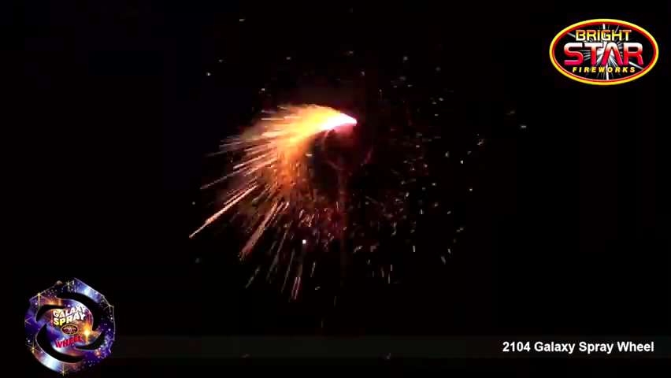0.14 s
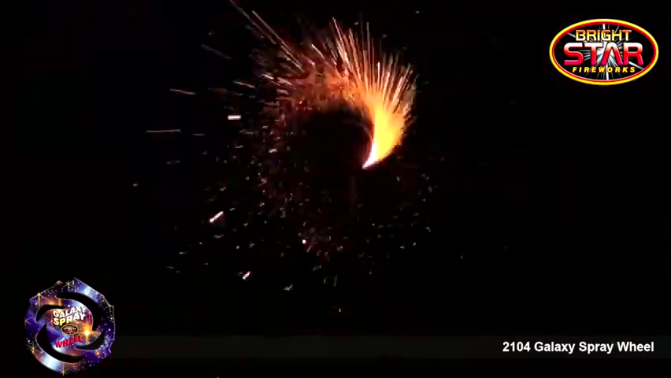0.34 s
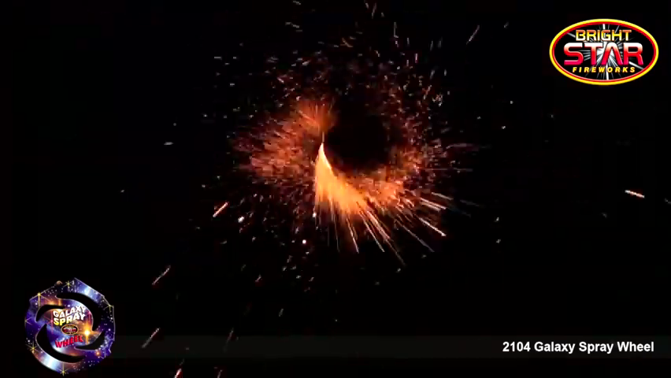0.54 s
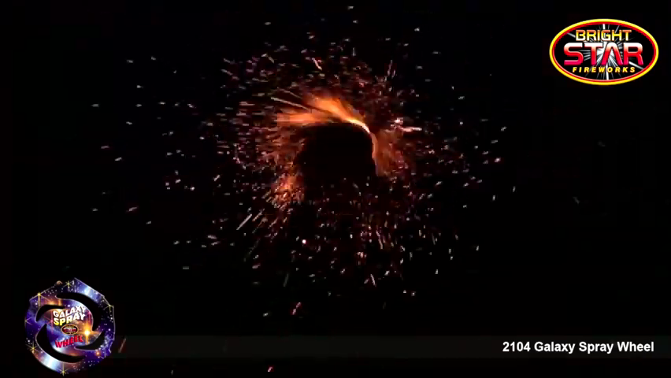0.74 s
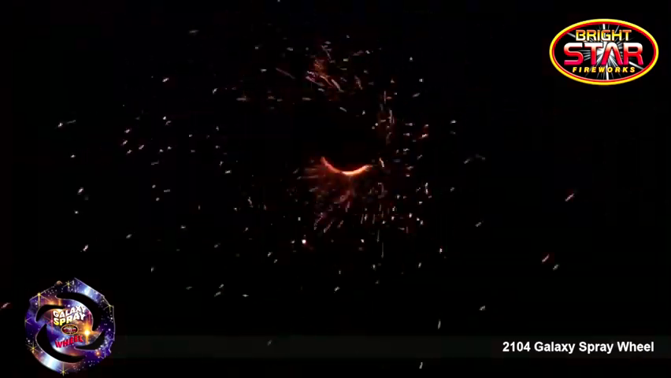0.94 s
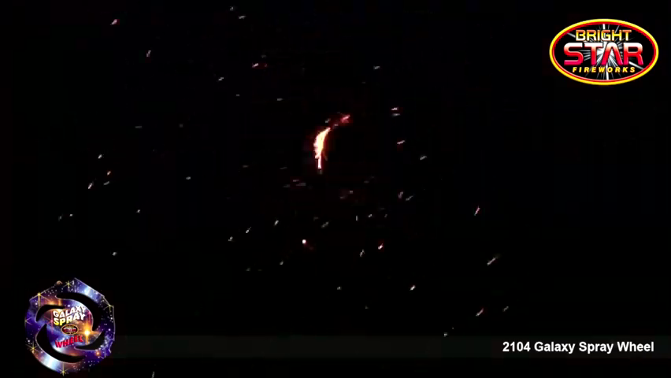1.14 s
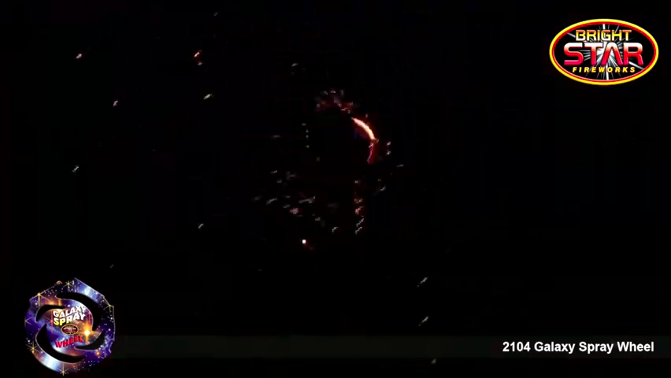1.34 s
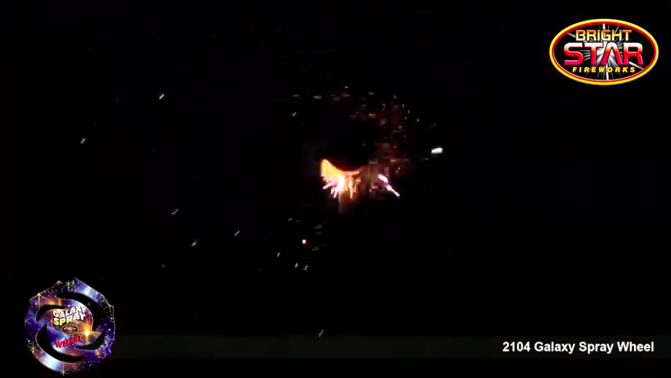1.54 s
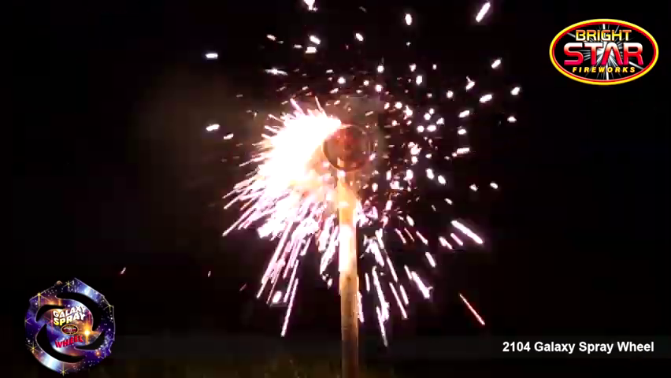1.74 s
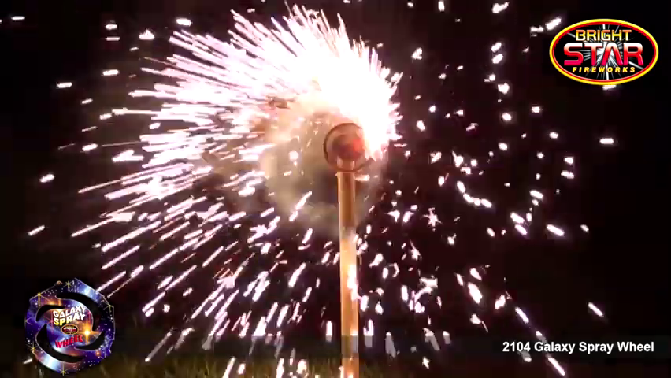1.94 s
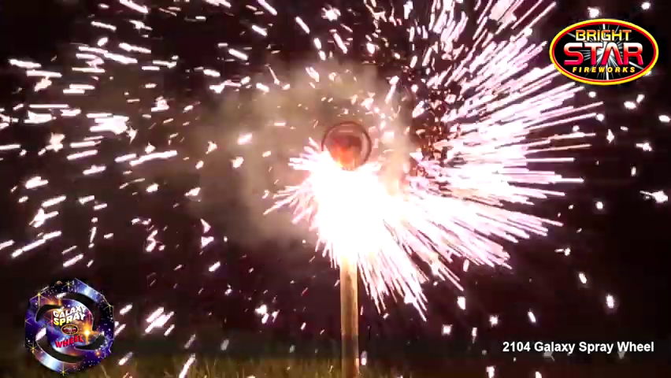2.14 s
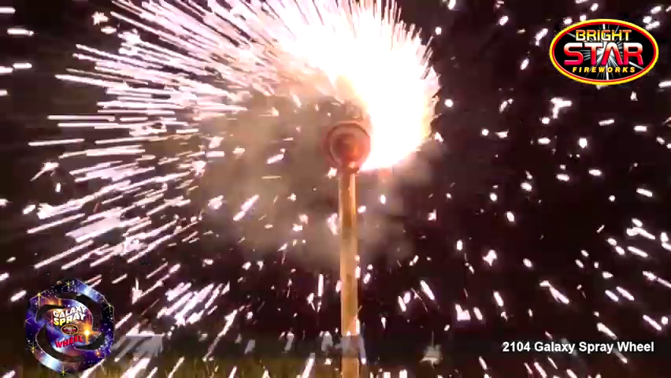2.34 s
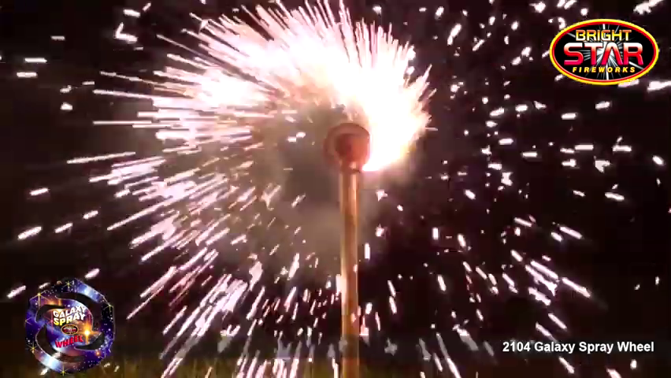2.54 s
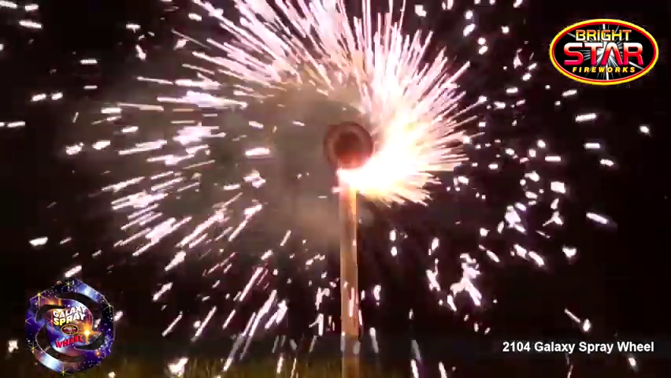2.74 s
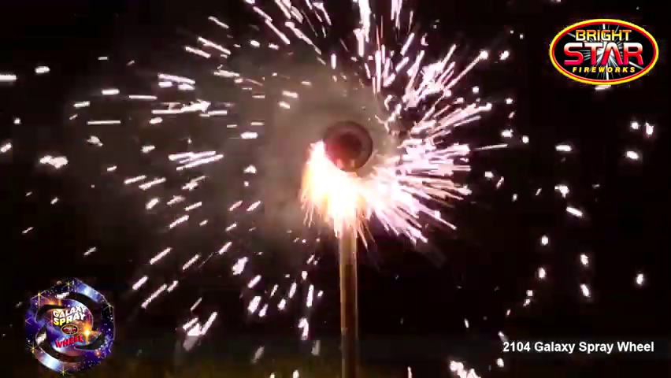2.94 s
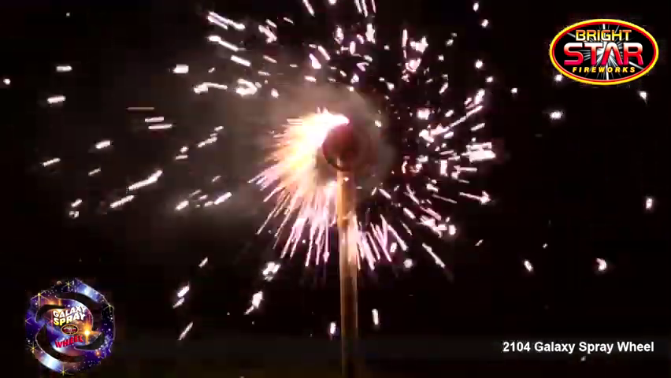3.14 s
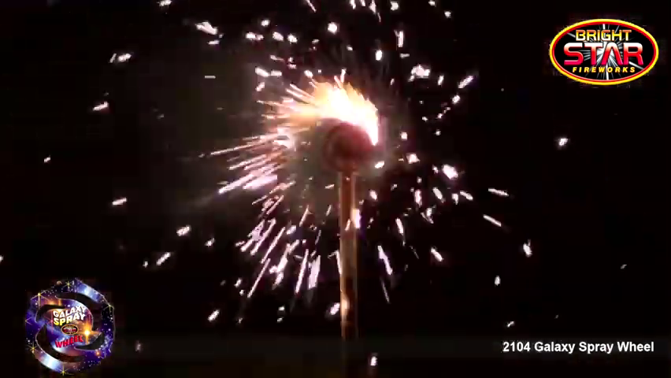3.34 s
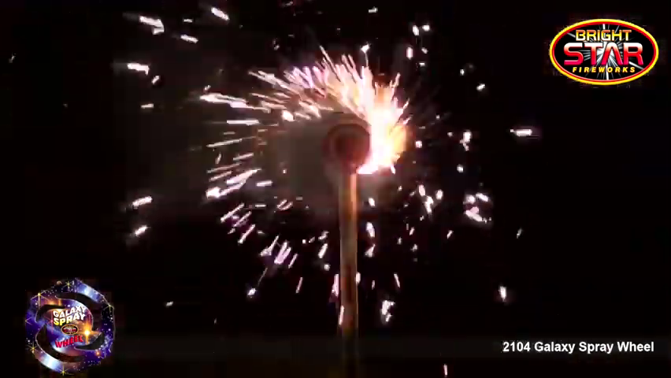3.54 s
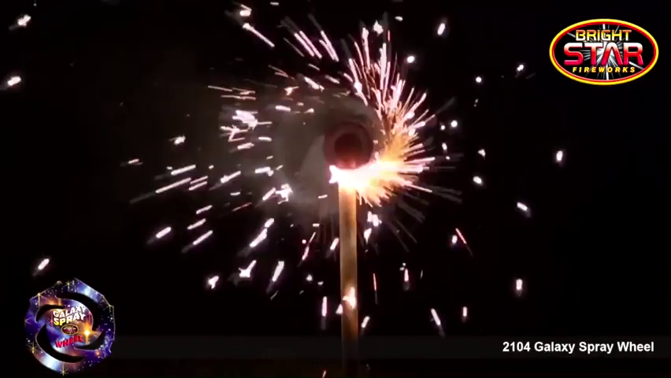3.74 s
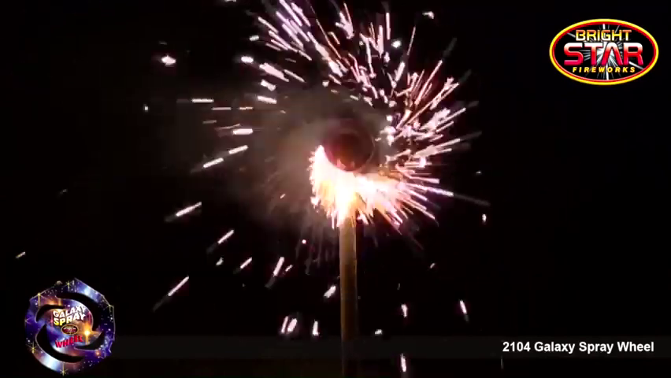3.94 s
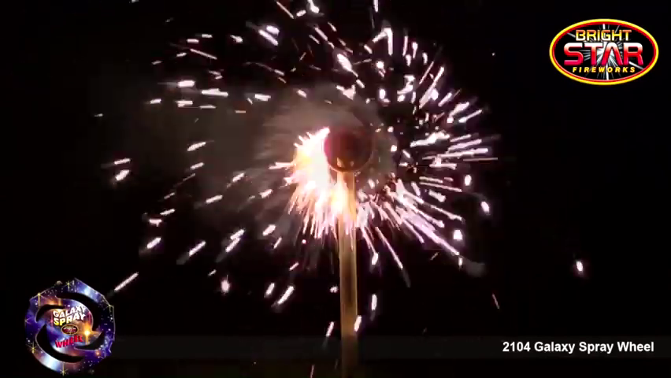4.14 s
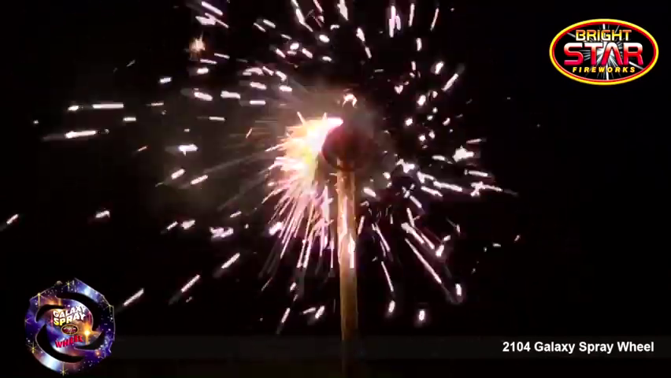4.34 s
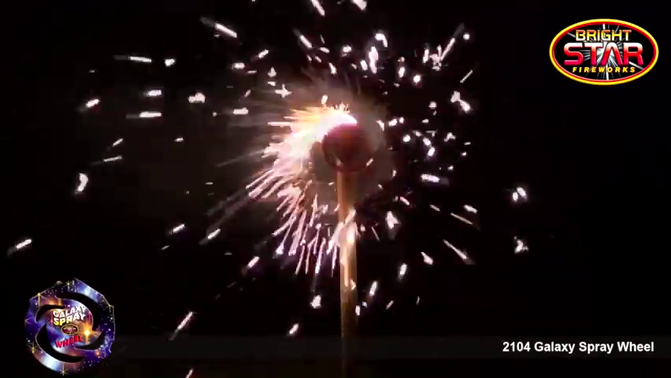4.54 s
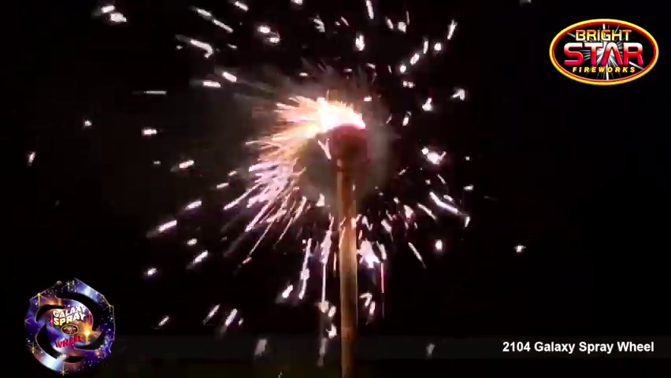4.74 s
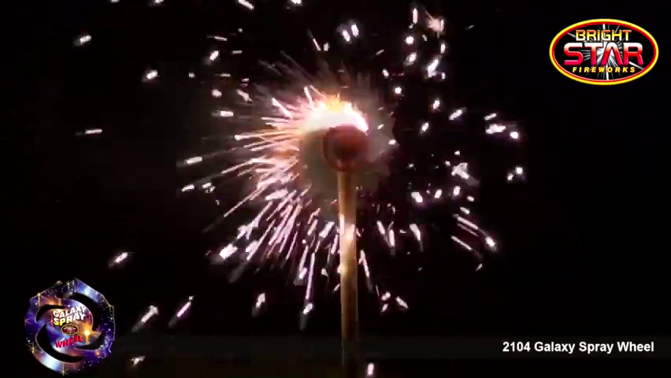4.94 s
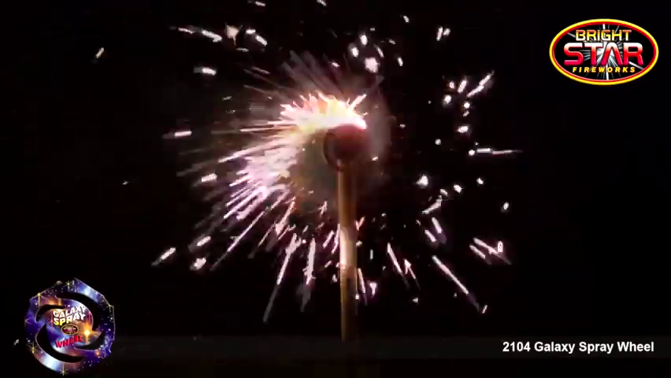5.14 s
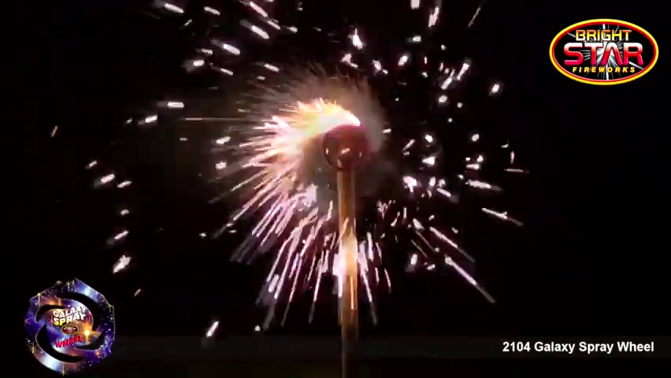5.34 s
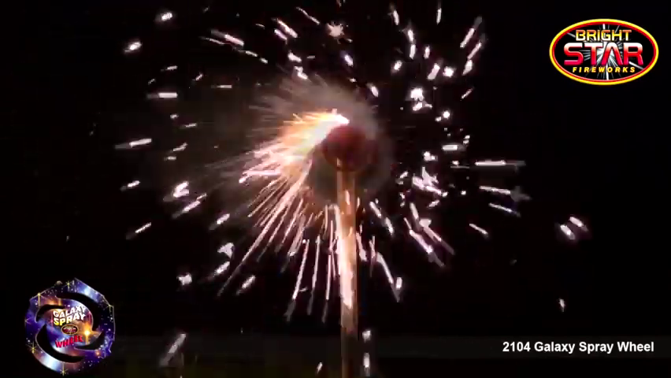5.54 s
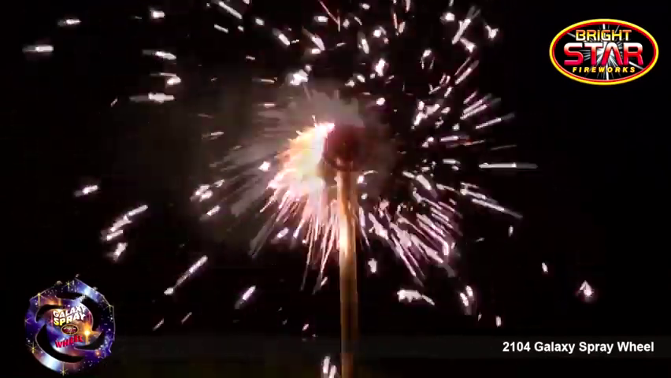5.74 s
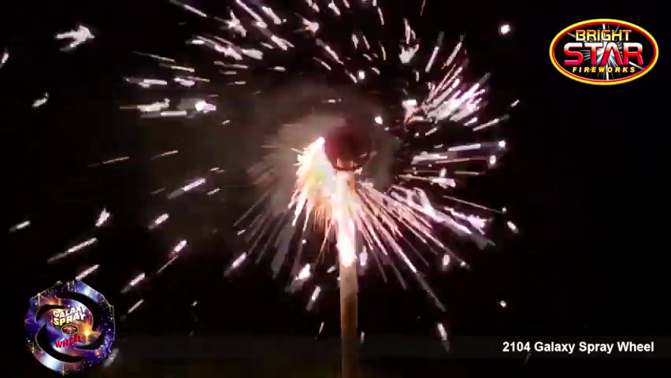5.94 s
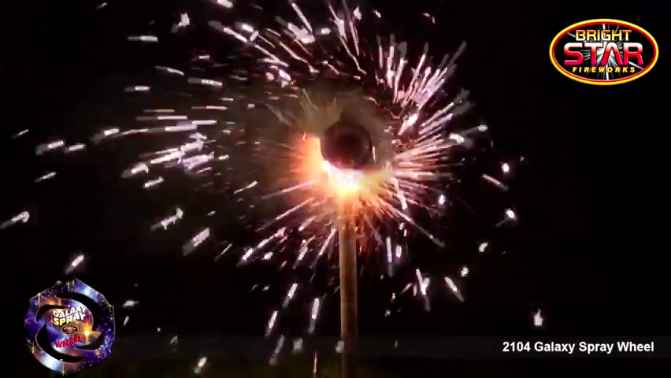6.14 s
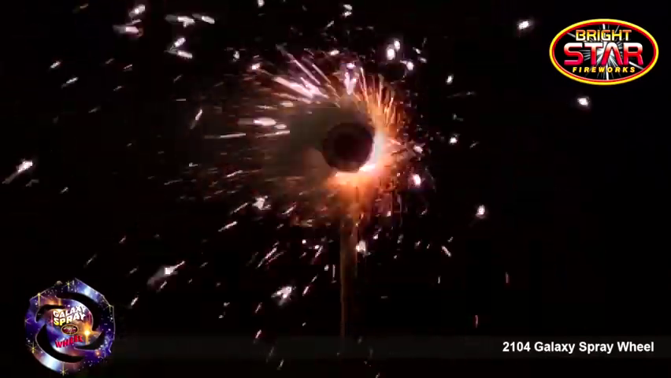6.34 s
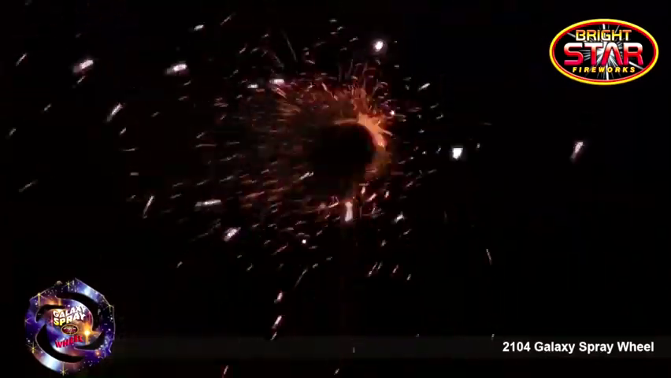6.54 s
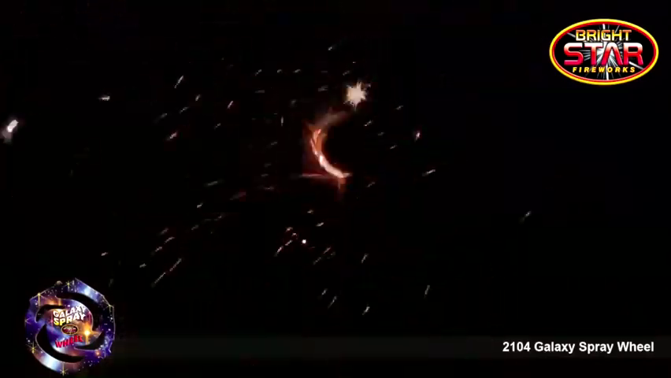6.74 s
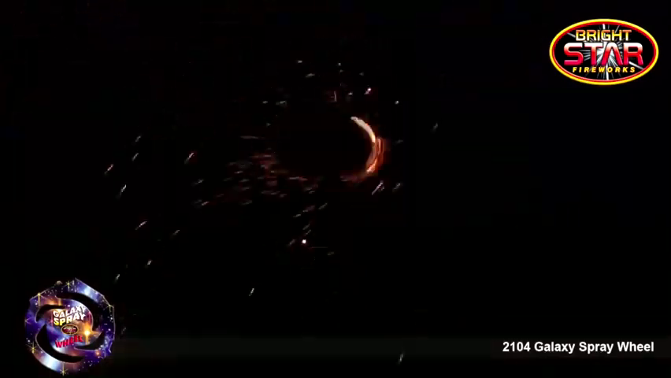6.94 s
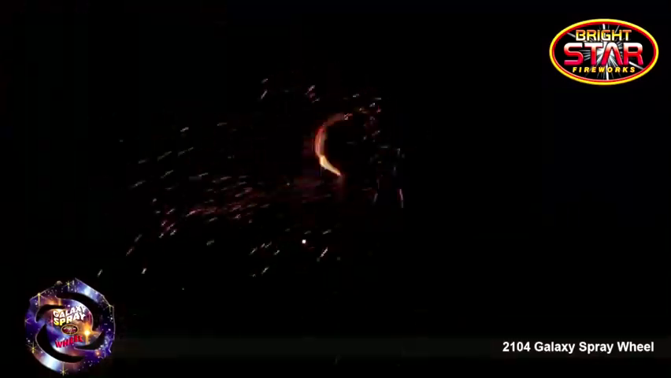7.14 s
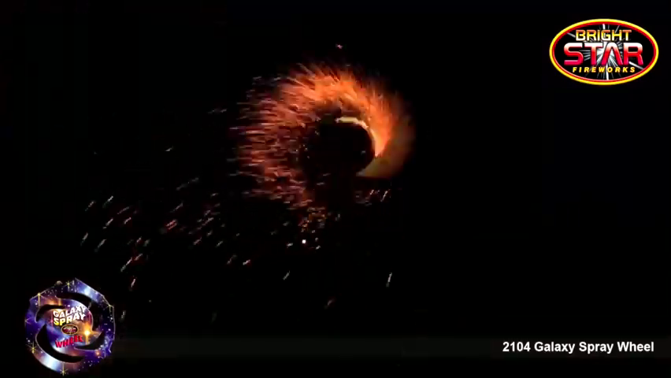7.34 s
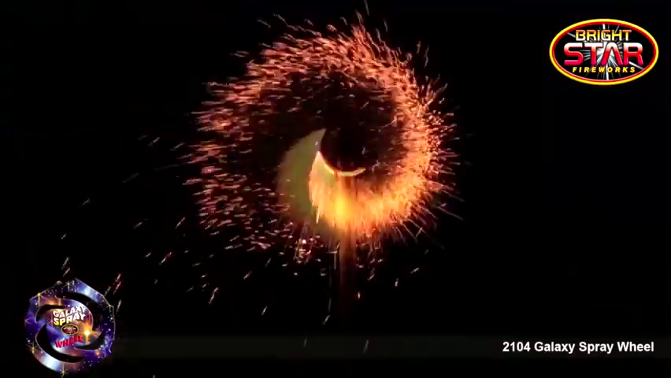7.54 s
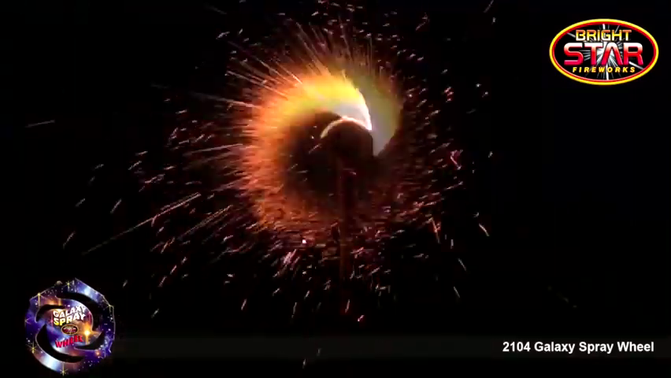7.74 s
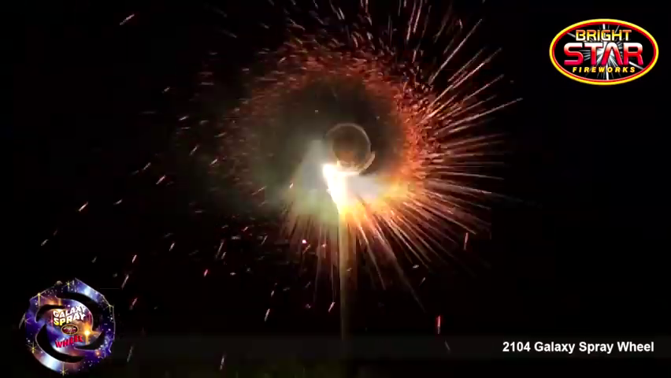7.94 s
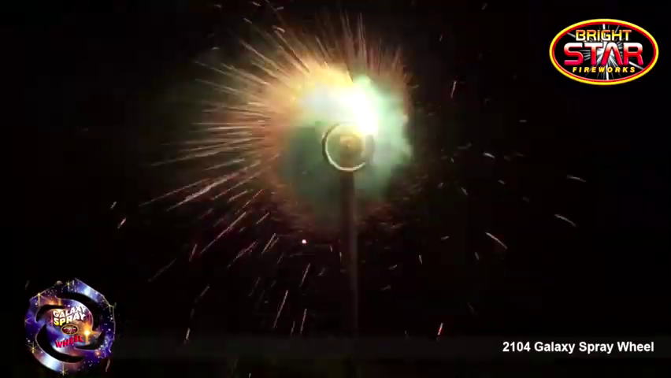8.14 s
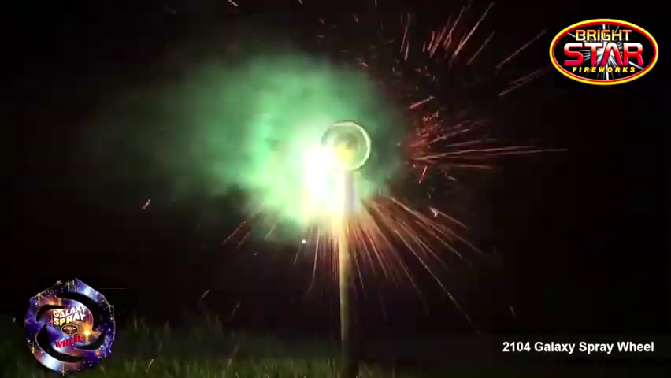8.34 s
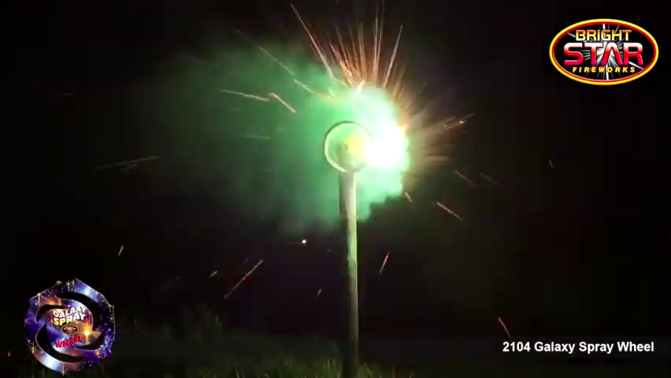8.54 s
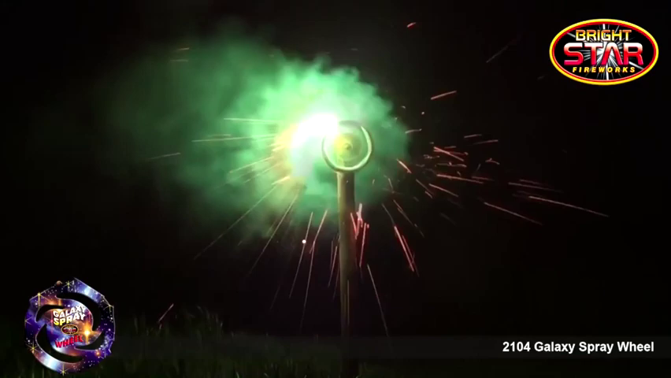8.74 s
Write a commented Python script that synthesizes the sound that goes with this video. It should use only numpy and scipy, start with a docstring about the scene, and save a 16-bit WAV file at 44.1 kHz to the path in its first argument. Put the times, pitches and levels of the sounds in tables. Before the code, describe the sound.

A wheel firework is already spinning at the start, some metres away in an open field, making a loud, bright, gassy hiss that swirls about seven times a second. From 0.7 seconds the hiss fades, with soft low thumps, leaving faint crackling fuse spurts. A small pop comes at 1.4 seconds, then the next stage catches and reaches full strength by 1.7. Its swirl quickens to about eleven turns a second near 2.8, and the hiss weakens slightly around 3.5 before recovering. From 6.2 seconds it dies away into weak sputtering, with a sharp pop at 6.7 and a short spit at 7.2. The third stage lights right after, builds by 7.6 and hisses steadily with a slower swirl until the end, near 9 seconds. A faint distant rumble and slight soft gusts lie underneath, with hardly any echo.

```python
"""The gas jet of a firework wheel hisses and spits sparks on a post in a field at night, some metres away.
The turning nozzle sweeps its beam round and shifts the delay of the ground reflection, so the hiss swirls.
Twice a driver (a tube of powder) burns out, the fuse sputters and pops, and the next driver catches.
Puffs of flame and soft gusts of wind add low thumps and swells, over a dull echo and a faint far rumble."""
import sys
import numpy as np
from scipy import signal
from scipy.fft import rfft, irfft, next_fast_len
from scipy.io import wavfile
from scipy.ndimage import uniform_filter1d, map_coordinates

SR = 44100
rng = np.random.default_rng(int(sys.argv[2]) if len(sys.argv) > 2 else 0)


def digitize_waveform(pressure):
    """Quantize a signal to 16-bit integers and store it at the path in sys.argv[1].

    Rows of a 2-D input are taken as channels; values are limited to [-1, 1].
    """
    field = np.atleast_2d(pressure).T
    bounded = np.clip(field, -1, 1)
    quanta = np.round(bounded * 32767).astype(np.int16)
    wavfile.write(sys.argv[1], SR, quanta)


N = 392049
TIME = np.arange(N) / SR
FFT_SIZE = next_fast_len(N)
FREQ = np.maximum(np.arange(FFT_SIZE // 2 + 1) * SR / FFT_SIZE, 1)


def undb(db):
    """Amplitude ratio of a level in decibels."""
    return 10 ** (np.asarray(db) / 20)


def unit(x):
    """Normalisation to a standard deviation of 1."""
    return x / np.std(x)


def over_time(table):
    """Linear interpolation of a table's columns at every sample."""
    times, *columns = np.transpose(table)
    return [np.interp(TIME, times, column) for column in columns]


def over_frequency(table):
    """Interpolation of a table's columns on a logarithmic frequency axis."""
    hz, *columns = np.transpose(table)
    return [np.interp(np.log(FREQ), np.log(hz), column) for column in columns]


def filtered(x, gain):
    """Linear filtering as multiplication of the spectrum."""
    return irfft(rfft(x, FFT_SIZE) * gain, FFT_SIZE)[..., :N]


def noise(gain):
    """Spectrally shaped Gaussian noise of rms 1."""
    return unit(filtered(rng.standard_normal(N), gain))


def low_pass(hz, corner_hz, order=2):
    """Butterworth magnitude response."""
    return 1 / np.sqrt(1 + (hz / corner_hz) ** (2 * order))


def bells(table, hz):
    """Response in dB of Gaussian peaks and notches."""
    return sum(db * np.exp(-np.log(2) * (2 * (hz - centre) / width) ** 2) for centre, width, db in table)


def wander(per_s):
    """Random modulation of spread 1, gliding between independent values."""
    hold = max(int(SR / per_s), 1)
    steps = np.repeat(rng.standard_normal(N // hold + 1), hold)[:N]
    return unit(uniform_filter1d(steps, hold))


def swell(peak_s, spread_s):
    """Gaussian envelope of height 1."""
    return np.exp(-.5 * ((TIME - peak_s) / spread_s) ** 2)


# The drivers. Each row: ignition in seconds, build-up in seconds, first level in dB relative to full,
# start of burn-out in seconds, full level in dB, sizzle in dB.
DRIVER_BURNS = [(-.3, .25, -15, 0.69, -27.5, 0.8), (1.452, 0.23, -31, 6.204, -27.5, 0),
                (7.262, 0.37, -15.5, 9.5, -28, 1)]
# The low roar in a driver's hiss. Each row: time in seconds, lift at full thrust in dB.
ROAR_LIFT = [(.4, -1.5), (.6, -7), (.8, -6.5), (1.0, 1.5), (1.45, -10), (1.7, 2.2), (2.3, -1.5), (3.4, -2),
             (4.2, -1), (5.0, 1.6), (5.6, -1.5), (6.4, 3), (7.5, 1), (8.2, -0.7)]
# Spurts of the fuse. Each row: peak time in seconds, level in dB, spread in seconds, roar lift in dB.
FUSE_SPURTS = [(1.081, -53, 0.017, 18), (1.213, -54.5, .036, 13.5), (1.295, -55.5, .013, 12),
               (1.507, -43.5, 0.032, -3), (6.66, -54, 0.013, -3), (6.814, -58, 0.039, 7),
               (7.075, -61, .022, 5), (7.188, -39, 0.013, -1.5)]


def combustion():
    """Incoherent flames add in power: total level, and power-weighted roar and sizzle, all in dB."""
    # the second driver slowly loses thrust, then regains part at once and the rest slowly
    sag_at_s, deepest_sag_db = 3.49, -4.5
    since_sag = np.maximum(TIME - sag_at_s, 0)
    unrecovered = .46 * np.exp(-since_sag / .06) + .54 * np.exp(-since_sag)
    sag_db = deepest_sag_db * np.where(since_sag > 0, unrecovered, swell(sag_at_s, spread_s=.4))
    fuse_db, fuse_roar_db, dullest_db = -62, 4, -2
    flames = [(undb(fuse_db), fuse_roar_db, dullest_db)]
    for peak_s, db, spread_s, lift_db in FUSE_SPURTS:
        flames.append((undb(db) * swell(peak_s, spread_s), lift_db, dullest_db))
    full_roar_db, = over_time(ROAR_LIFT)
    light_s, fade_s, fade_db = .016, .43, -35
    for catch_s, build_s, first_db, die_s, full_db, full_sizzle_db in DRIVER_BURNS:
        lit = (1 + np.tanh((TIME - catch_s) / (2 * light_s))) / 2
        building = np.clip(1 - (TIME - catch_s) / build_s, 0, 1)
        dying = np.clip((TIME - die_s) / fade_s, 0, 2) ** 3.47
        thrust_db = first_db * building + fade_db * dying + sag_db
        # a weak jet is duller: more roar, less sizzle
        roar_db = full_roar_db - .49 * thrust_db
        sizzle_db = np.maximum(full_sizzle_db + 1.3 * thrust_db, dullest_db)
        flames.append((lit * undb(full_db + thrust_db), roar_db, sizzle_db))
    power = sum(gain ** 2 for gain, _, _ in flames)
    mean_roar_db = sum(gain ** 2 * roar for gain, roar, _ in flames) / power
    mean_sizzle_db = sum(gain ** 2 * sizzle for gain, _, sizzle in flames) / power
    return 10 * np.log10(power), mean_roar_db, mean_sizzle_db


# The jet's spectrum at full thrust. Each row: frequency in Hz, relative spectral density in dB.
JET_SPECTRUM = [(40, -38), (130, -28), (220, -19), (310, -15.5), (500, -9), (700, -7), (950, -4.5),
                (1350, -6.5), (2100, -1.5), (3500, 0.47), (5500, 0.5), (10000, -0.36), (13000, -0.5),
                (16000, -8)]


def turbulence():
    """Turbulent mixing noise: smooth hiss from the nozzle over the rougher roar of large eddies."""
    colour = undb(over_frequency(JET_SPECTRUM)[0])
    eddy_band = low_pass(FREQ, 2060)
    roar = rng.standard_normal(N)
    flicker = undb(1.37 * wander(per_s=420))
    roar *= flicker / np.sqrt(np.mean(flicker ** 2))
    hiss = rng.standard_normal(N)
    return unit(filtered(roar, colour * eddy_band) + filtered(hiss, colour * np.sqrt(1 - eddy_band ** 2)))


# Lobes of the beam. Each row: angle in turns, spread in turns, frequency in Hz, spread in Hz,
# nominal gain in dB.
BEAM_LOBES = [(0.5, 0.093, 1300, 490, 5.5), (0.43, 0.044, 2760, 1400, -2.5), (0.25, 0.19, 5140, 1080, 3.5),
              (0.56, 0.1, 5520, 330, -3.5), (0.93, 0.1, 6230, 790, 5.5), (0.18, 0.039, 7340, 360, -8),
              (0.61, 0.13, 8900, 1260, 3.5), (0.8, 0.064, 12100, 820, 4)]


def beam(hz, turn):
    """Directivity in dB: the wheel shades and mirrors the nozzle, beaming each band at its own angle."""
    swing_db = 0
    for angle, spread, lobe_hz, spread_hz, db in BEAM_LOBES:
        off_axis = (turn - angle + .5) % 1 - .5
        facing = np.exp(-.5 * (off_axis / spread) ** 2)
        band = np.exp(-.5 * ((hz - lobe_hz) / spread_hz) ** 2)
        swing_db += db * (facing - facing.mean()) * band
    return swing_db


def sparks(per_s, scatter_db):
    """Shot noise: burning grains crack at random instants, most of them faintly."""
    strength = undb(scatter_db * np.minimum(rng.exponential(size=N), 4))
    cracking = rng.random(N) < per_s / SR
    return unit(cracking * strength * rng.choice([-1, 1], N))


# Notches in the hiss. Each row: centre in Hz, width in Hz, gain at full thrust in dB.
JET_NOTCHES = [(2957, 856, -9), (7590, 790, -5.5)]


def jet(turns_per_s, turn):
    """Spectral modulation: thrust and beam colour the gas noise; grains crackle when the jet is weak."""
    level_db, roar_db, sizzle_db = combustion()
    focus = (turns_per_s / 9.84) ** .83  # a faster wheel deepens the lobes
    weakness = np.clip((-37 - level_db) / 20, 0, 1)
    hz, frame_s, frames = signal.stft(turbulence(), SR, nperseg=256, noverlap=192)
    hz = hz[:, None]
    turn, roar_db, thrust, sizzle_db, focus = (
        np.interp(frame_s, TIME, curve) for curve in (turn, roar_db, 1 - weakness, sizzle_db, focus))
    roar_band = low_pass(hz, 2100) ** 2
    treble_tilt = (.5 - low_pass(hz, 6700, order=4) ** 2) * (1 - roar_band)
    tilt_db = roar_db * roar_band + sizzle_db * treble_tilt
    notch_db = (1 + thrust) / 2 * bells(JET_NOTCHES, hz)
    # the plume wavers, each part of the spectrum on its own
    waver = uniform_filter1d(rng.standard_normal(frames.shape), size=9, axis=0)
    waver_db = .55 * unit(uniform_filter1d(waver, size=14, axis=1))
    colour_db = tilt_db + focus * beam(hz, turn) + notch_db + waver_db
    _, hiss = signal.istft(frames * undb(colour_db), SR, nperseg=256, noverlap=192)
    crackle = weakness * undb(-4) * sparks(per_s=400, scatter_db=3)
    uneven_db = (.62 + weakness) * wander(per_s=80)
    return (hiss[:N] + crackle) * undb(level_db + uneven_db)


# Reflection from grass. Each row: frequency in Hz, share of pressure returned, phase shift in radians.
GRASS_REFLECTION = [(300, .78, -.1), (1000, .74, -.2), (2000, .6, -.44), (4000, .32, .35), (6500, .28, .2),
                    (12000, .22, 0)]


def with_ground_reflection(direct, turn):
    """Comb-filter interference: the bounce off the grass lags most with the nozzle at its highest."""
    lag_s = .002098 + .000158 * np.cos(2 * np.pi * turn)
    share, phase = over_frequency(GRASS_REFLECTION)
    bounce = filtered(direct, share * np.exp(1j * phase))
    return direct + map_coordinates(bounce, [(TIME - lag_s) * SR], order=3)


def field_echo(source, t60_s=.74, echo_db=-44):
    """Diffuse scattering: the surroundings return a faint, dull echo, in antiphase at the two ears."""
    tail = noise(low_pass(FREQ, 210)) * undb(-60 * TIME / t60_s)
    echo = signal.fftconvolve(source, tail[:SR])[:N]
    return unit(echo) * np.std(source) * undb(echo_db) * np.array([[1], [-1]])


# The air over the field. Each row: frequency in Hz, relative spectral density in dB.
NIGHT_SPECTRUM = [(25, -6), (60, -1), (110, 1.5), (220, -6.5), (400, 3.5), (680, -0.5), (950, -4),
                  (2000, -17), (6000, -15), (16000, -22)]


def night_air():
    """Ambient noise: a far rumble that wanders in level, slightly decorrelated in the bass."""
    colour = undb(over_frequency(NIGHT_SPECTRUM)[0])
    drift = undb(1.5 * wander(per_s=5))
    mid = noise(colour) * undb(-66.5)
    side = noise(colour * low_pass(FREQ, 500)) * undb(-84.5)
    return drift * (mid + side * np.array([[1], [-1]]))


# Low thumps and rumbling swells. Each row: peak time in seconds, thump level in dB, spread in seconds,
# growl in dB relative to the thump.
LOW_SWELLS = [(0.37, -57, 0.02, 13), (.425, -60, 0.013, 19), (0.89, -53, 0.0074, -10), (.97, -62, .025, -8),
              (1.664, -60, 0.023, 16.5), (6.482, -69, 0.13, 7), (6.85, -70, .06, 1)]


def puffs_and_gusts():
    """Unsteady flow: puffs of flame and soft gusts of wind make low thumps and rumbling swells."""
    thump = noise(low_pass(FREQ, 133, order=3) * (1 - low_pass(FREQ, 51)))
    growl = noise(low_pass(FREQ, 590) * (1 - low_pass(FREQ, 298, order=5)))
    return sum(undb(db) * swell(peak_s, spread_s) * (thump + undb(growl_db) * growl)
               for peak_s, db, spread_s, growl_db in LOW_SWELLS)


# Flaws in the burning powder. Each row: start in seconds, crack level before filtering in dB,
# fizz level in dB, fizz decay time in seconds, amplitude of the dull body relative to the fizz.
POWDER_POPS = [(1.3744, -44, -31.5, .0016, .3), (6.6815, -52, -54, .002, .1),
               (6.7457, -24, -47.5, .016, .7), (7.053, -56, -54, .006, .1)]


def pops(crack_decay_s=.00009):
    """Impulsive sources: each pop is a pressure step that dies at once, then a short fizz."""
    fizz = noise(1 - low_pass(FREQ, 2800))
    body = noise(low_pass(FREQ, 3300) * (1 - low_pass(FREQ, 660)))
    cracks, tails = np.zeros(N), np.zeros(N)
    for start_s, crack_db, fizz_db, fizz_decay_s, dullness in POWDER_POPS:
        age = np.maximum(TIME - start_s, 0)
        cracks += undb(crack_db) * (age > 0) * np.exp(-age / crack_decay_s)
        tails += undb(fizz_db) * (age > 0) * np.exp(-age / fizz_decay_s) * (fizz + dullness * body)
    return filtered(cracks, 1 - low_pass(FREQ, 350)) + tails


# The wheel's rotation. Each row: time in seconds, speed in turns per second.
WHEEL_SPEED = [(0.0, 6.597), (1.0, 7.188), (1.72, 6.186), (2.09, 7.202), (2.49, 10.229), (2.85, 11.299),
               (4.4, 10.438), (6.4, 9.007), (6.93, 7.39), (7.6, 7.052), (8.4, 7.983), (8.89, 8.02)]


def scene():
    """Superposition: the wheel straight ahead, its reflection, low swells, the echo and the night air."""
    turns_per_s, = over_time(WHEEL_SPEED)
    turn = -.056 + np.cumsum(turns_per_s) / SR  # the nozzle is at the top on whole turns
    near = with_ground_reflection(jet(turns_per_s, turn) + pops(), turn) + puffs_and_gusts()
    return near + field_echo(near) + night_air()


# Resonances and notches of the microphone and its grille. Each row: centre in Hz, width in Hz, gain in dB.
MIC_RESPONSE = [(1960, 460, 0), (4267, 455, -7.5), (9160, 2580, 5), (14300, 2200, -2.5)]


def record(dry, cutoff_hz=15750):
    """Frequency response: the microphone colours the treble and a steep low-pass limits the bandwidth."""
    top_cut = signal.ellip(12, .1, 80, cutoff_hz, fs=SR, output="sos")
    return signal.sosfilt(top_cut, filtered(dry, undb(bells(MIC_RESPONSE, FREQ))))


dry = scene()
out = record(dry)
digitize_waveform(out)
```